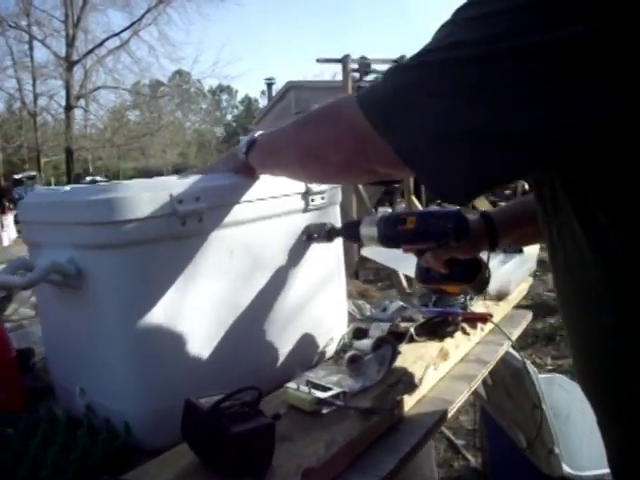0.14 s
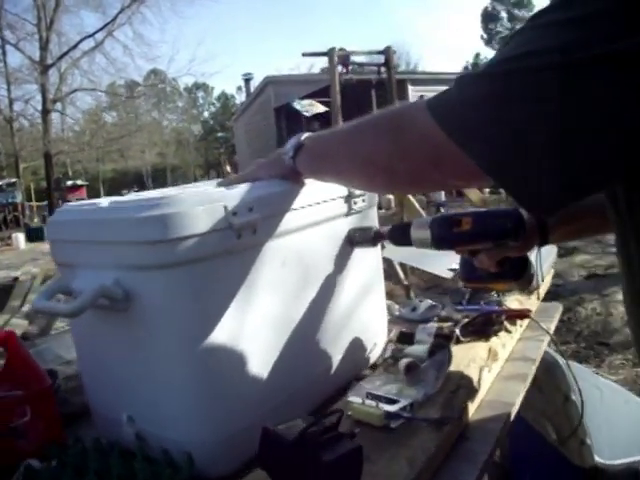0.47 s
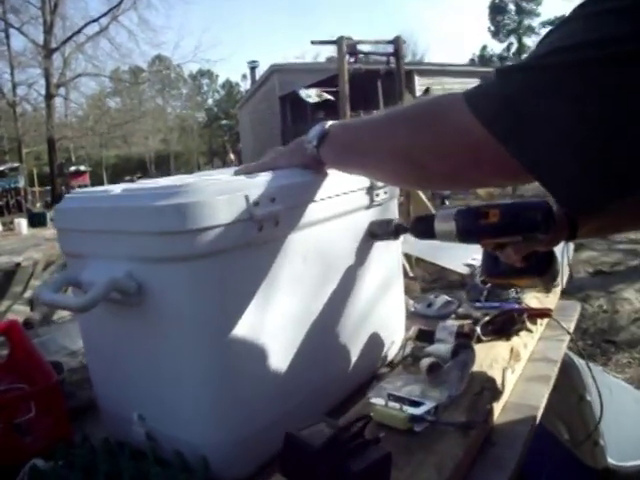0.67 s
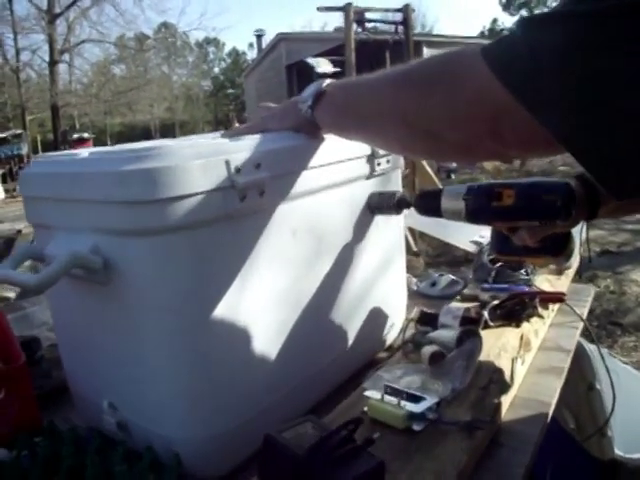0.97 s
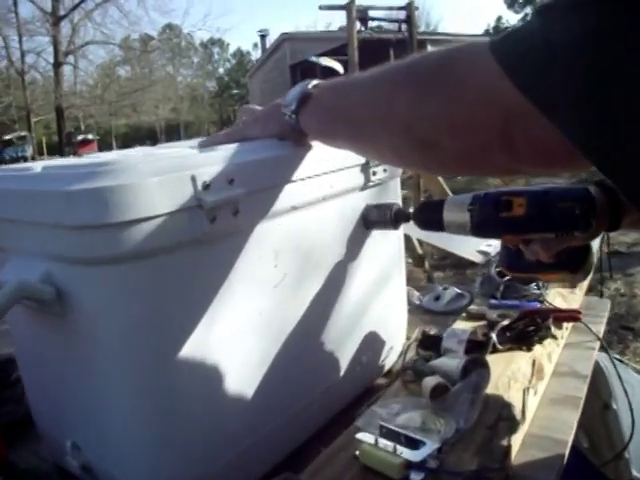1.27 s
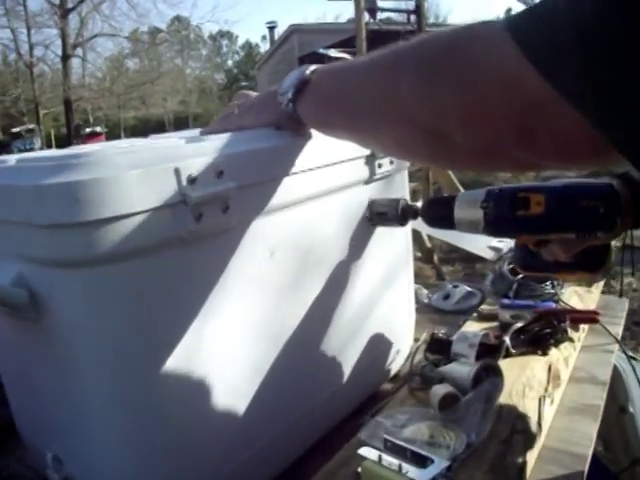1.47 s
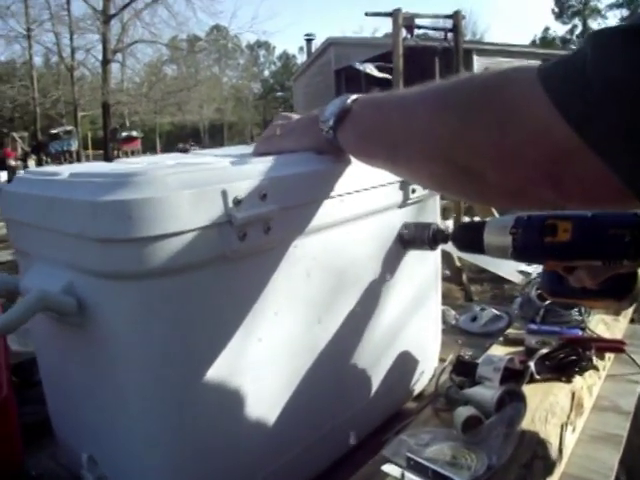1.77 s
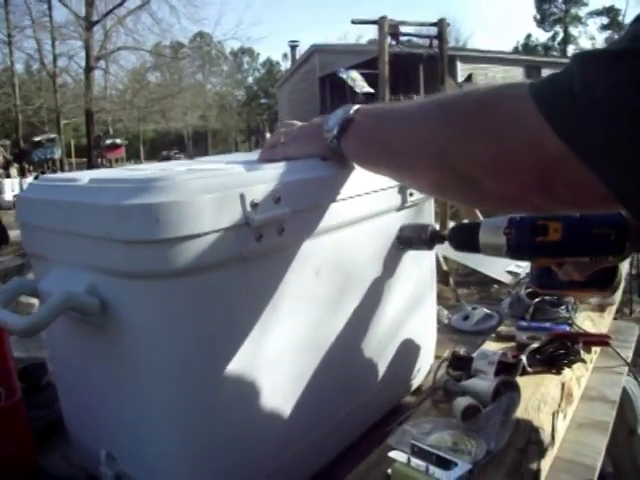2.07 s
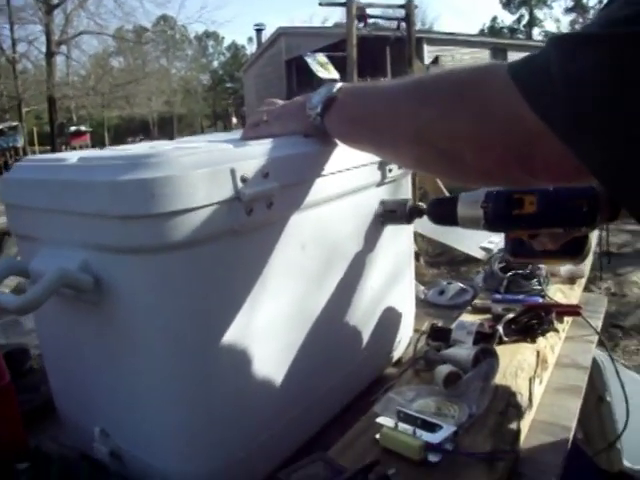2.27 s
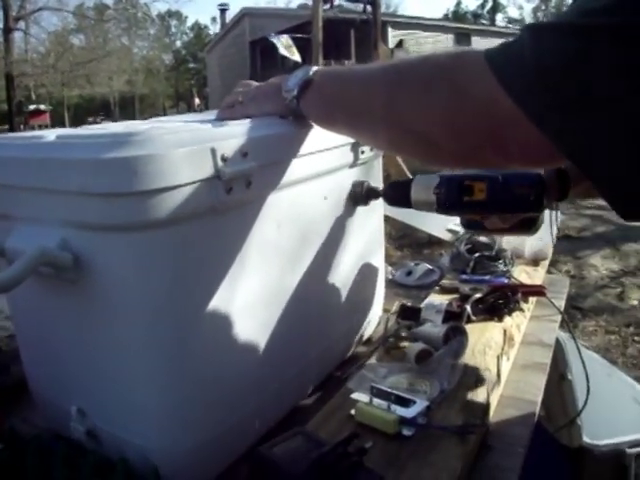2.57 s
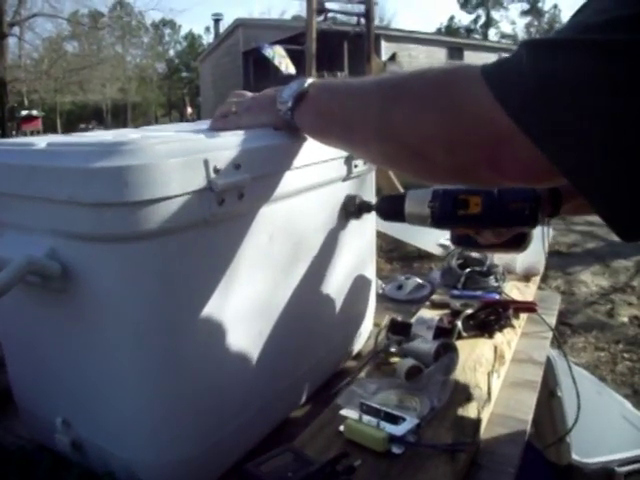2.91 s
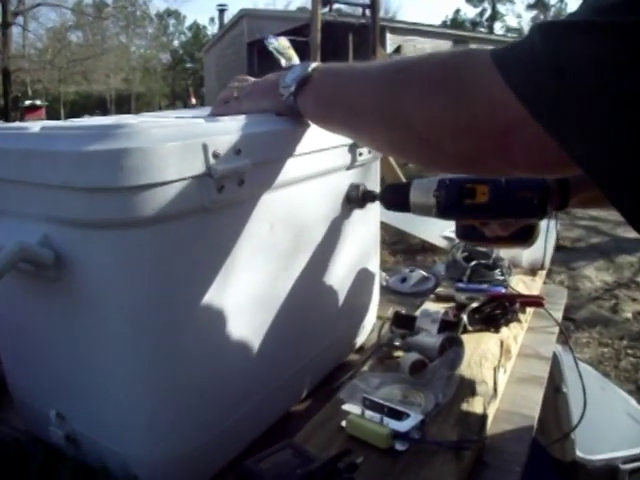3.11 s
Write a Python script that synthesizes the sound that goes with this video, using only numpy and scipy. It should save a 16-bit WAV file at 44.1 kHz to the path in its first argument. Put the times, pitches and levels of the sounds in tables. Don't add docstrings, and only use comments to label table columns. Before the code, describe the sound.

A cordless drill hole-saws a hollow plastic box outdoors, recorded close on a harsh, distorted low-rate camera microphone. Rattling, whining bursts run 0.05-0.3 and 0.4-0.74 seconds, the latter coasting briefly. A knock at 0.9 opens a third burst until 1.3; a short squeak at 1.4 leads into a fourth until 2.05. From 2.2 it grinds on to the end, pitch sagging, chips squealing, over gusty wind rumble.

```python
import sys
import numpy as np
from scipy import signal
from scipy.fft import rfft, irfft
from scipy.io import wavfile
from scipy.ndimage import uniform_filter1d

SR = 44100
rng = np.random.default_rng(int(sys.argv[2]) if len(sys.argv) > 2 else 0)


def generate_wav(signal):
    frames = np.transpose(np.atleast_2d(signal))
    scaled = np.clip(frames, -1, 1) * 32767
    pcm = np.round(scaled).astype(np.int16)
    wavfile.write(sys.argv[1], SR, pcm)


def level_to_linear(level):
    exponent = np.asarray(level, float) / 20
    return 10 ** exponent


N = 143325
T = np.arange(N) / SR
STEP = 4


def noise():
    return rng.standard_normal(N)


def follow(table):
    return np.interp(T, *np.transpose(table))


def evened(x):
    return x / np.sqrt(np.mean(x ** 2) + 1e-20)


def colour(x, points):
    f, db = np.transpose(points)
    log_hz = np.log(np.fft.rfftfreq(len(x), 1 / SR) + 1)
    gain_db = np.interp(log_hz, np.log(f), db, left=db[0] - 28.5, right=db[-1] - 21.0)
    return evened(irfft(rfft(x) * level_to_linear(gain_db), len(x)))


def slow(size):
    return evened(uniform_filter1d(uniform_filter1d(noise(), size), size))


def ring(x, modes):
    out = np.zeros(len(x))
    for hz, width, db in modes:
        r = np.exp(-np.pi * width / SR)
        poles = [1, -2 * r * np.cos(2 * np.pi * hz / SR), r * r]
        out += level_to_linear(db) * evened(signal.lfilter([1, 0, -1], poles, x))
    return evened(out)


def hum(x, track, width_hz):
    s, hz, db = np.transpose(track)
    turn = np.exp(2j * np.pi * np.cumsum(np.interp(T, s, hz)) / SR)
    r = np.exp(-np.pi * width_hz / SR)
    band = signal.lfilter([1], [1, -2 * r, r * r], x / turn)
    return level_to_linear(np.interp(T, s, db) + 9) * evened((turn * band).real)


def tone(track, orders=(1, 2), rough=1):
    s, hz, *db = np.transpose(track)
    turns = np.cumsum(np.interp(T, s, hz) * (1 + .008 * slow(size=150))) / SR
    on = uniform_filter1d(((T > s[0]) & (T < s[-1])) * 1., size=200)
    out = np.zeros(N)
    for i, k in enumerate(orders):
        level = np.interp(T, s, db[i % 2]) - 1.5 * (i // 2) - 1
        if k == 2 * orders[0]:
            level = level - 3
        grain = 2.5 * slow(size=50)
        flicker = 3 * slow(size=250)
        out += level_to_linear(level + rough * (grain + flicker)) * np.sin(2 * np.pi * k * turns)
    return np.sqrt(2) * on * out


# frequency in Hz, density in dB per Hz.
YARD_TONE = [(120, -39), (200, -11), (451, -9.5), (1320, -8), (1840, -4), (2430, -7), (2820, -0.5),
             (4700, -25.5), (5400, -6), (7020, -50), (11900, -120)]
# time in seconds, lift in dB.
YARD_SWELL = [(0, 2), (.06, 0.5), (.34, 4.5), (.8, 8.5), (.88, 0.5), (.92, 4), (1.34, 5), (1.4, 5),
              (2.1, 4.5), (2.19, 0.5)]


def yard():
    return level_to_linear(-33.5 + follow(YARD_SWELL) + slow(size=500)) * colour(noise(), YARD_TONE)


# time in seconds, level in dB.
WIND_LEVEL = [(0, -12), (.05, -18.5), (.27, -15.5), (.31, -14), (.38, -19.5), (.44, -13), (.64, -29.5),
              (.74, -19), (.9, -20.5), (.95, -12.5), (1.0, -28), (1.24, -22), (2.04, -31), (2.12, -19.5),
              (2.18, -28), (2.22, -14.5), (2.32, -28), (2.5, -45), (2.67, -28.5), (2.9, -40)]
# frequency in Hz, density in dB per Hz.
WIND_TONE = [(12, -10.5), (28, 2), (50, -3.5), (90, -5.5), (140, -12.5), (300, -36.5)]
# centre in seconds, length in seconds, frequency in Hz, level in dB.
SLAPS = [(0.29, 0.12, 24, -5.5), (0.33, 0.065, 44, -6.5), (0.38, 0.042, 35.4, -5.5), (0.41, 0.016, 50, -5),
         (0.892, 0.057, 46, -1), (0.092, 0.028, 50, -13), (0.919, 0.022, 35, -11), (2.122, 0.067, 28, -6.5),
         (0.54, .04, 29, -12)]


def wind():
    rumble = level_to_linear(follow(WIND_LEVEL) - 2.0 + 3.2 * slow(size=900)) * colour(noise(), WIND_TONE)
    slaps = np.zeros(N)
    for s, length, hz, db in SLAPS:
        window = np.cos(np.pi * np.clip((T - s) / length, -.5, .5)) ** 2
        slaps += level_to_linear(db) * window * np.cos(2 * np.pi * hz * (T - s))
    return rumble - slaps


# time in seconds, boom level in dB.
BITE = [(.04, -41.5), (.2, -18), (.36, -32.5), (.5, -25.5), (.75, -25), (.785, -35), (.83, -44), (.95, -21),
        (1.27, -24.5), (1.39, -38.5), (1.44, -23), (2.06, -25.5), (2.15, -44), (2.24, -22), (2.34, -27),
        (2.5, -13), (2.6, -27)]
# frequency in Hz, width in Hz, level in dB.
BOX_MODES = [(214.4, 42.5, -1.5), (270, 68, -3.5)]


def boom():
    drum = colour(ring(noise(), BOX_MODES), [(90, 3.0), (520, -9.5)])
    return level_to_linear(follow(BITE) + 3.0 * slow(size=300)) * drum


def knock():
    return -level_to_linear(-7) * np.exp(-abs(T - .896) / .0003)


# time in seconds, frequency in Hz, 2nd and 3rd partial in dB.
SQUEAK = [
    (1.403, 550, -28, -24),
    (1.409, 607, -22, -12),
    (1.422, 706, -17, -14),
    (1.432, 643, -15, -22),
]


def squeak():
    return tone(SQUEAK, orders=(2, 3, 4), rough=.3)


# time in seconds, peak level in dB.
SNAGS = [(.074, -10), (.088, -12), (0.3132, -12), (0.368, -9), (0.401, -4.5), (0.619, 1.5), (0.7393, -7),
         (0.924, 4.5), (1.0813, 0.5), (1.1445, 4.5), (1.201, 4), (1.4344, -4), (1.4717, 4.5), (1.9973, 1),
         (2.2034, 0.5), (2.8089, 2)]


def snags():
    rise_s, t60_s = .007, .032
    shape = np.zeros(N)
    for s, db in SNAGS:
        rise = np.clip((T - s) / rise_s + .5, 0, 1)
        shape += rise * level_to_linear(db - 5.5 - 60 * abs(T - s) / t60_s)
    return shape * colour(noise(), [(150, -14.5), (1000, 0), (1900, 5), (3000, 7.0), (5500, -32)])


# time in seconds, frequency in Hz, level in dB, octave in dB.
WHINE_1 = [(.11, 1500, -32, -36), (.135, 1950, -17.5, -13), (.17, 2320, -18.5, -24), (.2, 2470, -22, -32)]
WHINE_2 = [(0.429, 1800, -11, -36), (0.459, 2460, -28, -40.5), (0.61, 2612, -15, -42),
           (0.636, 2500, -16, -40), (0.661, 2263, -21, -34), (0.729, 2005, -30, -46)]
WHINE_3 = [(.975, 1753, -15, -32), (0.994, 1898, -11.5, -16), (1.02, 2186, -19, -15.5),
           (1.035, 2290, -20, -16), (1.063, 2434, -22, -37), (1.117, 2450, -29, -30),
           (1.29, 2680, -36, -48)]
WHINE_4 = [(1.475, 1400, -23, -47), (1.49, 1485, -14, -27), (1.52, 2110, -17, -12),
           (1.561, 2387, -25.5, -35.5), (1.7, 2575, -19.5, -49), (1.85, 2547, -15, -58),
           (2.001, 2546, -22, -48)]
WHINE_5 = [(2.26, 1800, -6, -29), (2.275, 1975, -14.5, -18), (2.34, 2332, -15.5, -34),
           (2.375, 2220, -19, -41), (2.399, 2320, -16, -24), (2.439, 2132, -12.5, -23),
           (2.494, 2210, -19.5, -47), (2.547, 2023, -18, -18.5), (2.6, 2250, -18.5, -29),
           (2.7, 2475, -20, -35), (2.819, 2444, -18, -55), (2.898, 2325, -17, -34), (3.0, 2226, -13.5, -22),
           (3.12, 2300, -16.5, -29), (3.25, 2425, -17.5, -46)]
WHINES = [WHINE_1, WHINE_2, WHINE_3, WHINE_4, WHINE_5]
STAGE_3 = [(1.08, 2150, -49, -36), (1.23, 2290, -28, -47)]
STAGE_4 = [(1.6, 2170, -26, -29), (1.801, 2240, -25, -26), (2.002, 2270, -30, -30)]


def gear_whine():
    return sum(tone(track) for track in WHINES + [STAGE_3, STAGE_4])


# start in seconds, rise in seconds, stop in seconds, fall in seconds, level in dB.
SQUEEZES = [
    (0.052, 0.067, 0.28, 0.028, -9.5),
    (0.394, 0.027, 0.743, 0.006, -9),
    (0.922, 0.017, 1.266, 0.058, -9.5),
    (1.426, 0.0072, 2.055, 0.028, -10),
    (2.198, 0.018, 3.6, .03, -11.5),
]


def trigger():
    level = np.zeros(N)
    for a, up, b, down, db in SQUEEZES:
        times = [a - .001, a, a + up, b, b + down, b + down + .001]
        level += level_to_linear(np.interp(T, times, [-99, db - 30.5, db, db, db - 18.5, -99]))
    return level


def tooth_clicks():
    s, hz = np.transpose(np.concatenate(WHINES))[:2]
    turn = np.cumsum(np.interp(T, s, hz)) / SR / 72
    throb = (1 + .12 * np.cos(2 * np.pi * turn)) * level_to_linear(1.5 * slow(size=160) + .7 * slow(size=700))
    strikes = rng.random(N) < 4500 / SR
    spread_db = 1.5 * np.minimum(rng.exponential(1, N), 4)
    return throb * strikes * noise() * level_to_linear(spread_db)


def coasting():
    stop_s = .742
    fall = (T > stop_s) * level_to_linear(-19.5 - 135 * abs(T - stop_s))
    return fall * colour(noise(), [(1200, -30), (2250, 8.5), (3100, 8), (4300, -28)])


# frequency in Hz, density in dB per Hz.
RATTLE_TONE = [(210, -44), (350, -16), (493, -22), (688, -13.5), (926, -16), (1860, -6.5), (2400, -4.5),
               (2910, 0), (5400, -21), (7020, -69), (11900, -120)]
# frequency in Hz, width in Hz, level in dB.
HOUSING = [(1800, 230, 0)]
# time in seconds, level in dB.
DEPTH = [(.3, -33), (.7, 2.5), (1.0, -1), (2.1, 2.5), (2.3, 8)]
# time in seconds, frequency in Hz, level in dB.
WALL = [(.6, 696, -41), (0.951, 654, -26), (1.55, 670, -36.5), (1.7, 717, -23.5), (2.0, 717, -30.5),
        (2.299, 570, -28.5), (2.55, 587, -25.5), (2.75, 706, -32), (2.921, 580, -23.5), (3.15, 675, -24.5)]
UPPER_WALL = [(2.0, 870, -49), (2.251, 870, -24), (2.4, 866, -56), (2.62, 922, -33.5)]
CHIPS = [(2.3, 1800, -46), (2.55, 640, -40), (2.58, 760, -18), (2.615, 983, -19), (2.64, 1000, -35),
         (2.93, 1360, -57), (2.96, 1570, -27), (3.0, 1800, -20), (3.04, 1720, -26), (3.09, 1970, -9),
         (3.12, 1800, -22), (3.16, 2040, -17), (3.25, 1900, -36)]
RIM = [(.1, 2080, -34), (.17, 2180, -21), (.3, 2035, -31), (1.55, 2870, -36), (1.7, 2660, -32),
       (2.05, 2680, -27), (2.25, 3210, -17), (2.4, 2680, -19), (2.6, 3000, -38), (3.1, 2600, -28.5)]
CUP = [(.1, 2700, -48), (.25, 3070, -34), (1.5, 2900, -15.5), (2.0, 2960, -16.5), (2.3, 2670, -24),
       (2.55, 2880, -25), (2.7, 2880, -13), (3.25, 2780, -19)]


def rattle():
    teeth = tooth_clicks()
    wide = evened(colour(teeth, RATTLE_TONE) + level_to_linear(-17) * ring(teeth, HOUSING))
    low = signal.filtfilt(*signal.butter(2, 1150, fs=SR), wide)
    cutting = 0.94 * (wide - low + low * level_to_linear(follow(DEPTH)))
    for track, width_hz in [(WALL, 130), (UPPER_WALL, 130), (CHIPS, 130), (RIM, 155), (CUP, 360)]:
        cutting = cutting + hum(teeth, track, width_hz)
    return trigger() * cutting + coasting()


def scene():
    background = yard() + wind()
    box = boom() + knock() + squeak() + snags()
    drill = gear_whine() + rattle()
    return (background + box + drill)[None]


# time in seconds, peak level in dB.
TICKS = [(0.0833, -37), (0.1242, -28), (0.4005, -35), (0.4245, -33), (0.4759, -31), (0.5183, -29),
         (0.628, -25), (0.6774, -32), (0.7408, -27), (0.9233, -37), (1.0431, -29), (1.0815, -23),
         (1.1174, -29), (1.1428, -23), (1.1648, -30), (1.2287, -29), (1.4347, -35), (1.4616, -27),
         (1.5409, -29), (1.5574, -29), (1.6412, -29), (1.7165, -30), (1.7994, -26), (1.9989, -22),
         (2.2284, -31), (2.3356, -30), (2.386, -33), (2.3985, -30), (2.4249, -28), (2.5247, -28),
         (2.6823, -33), (2.7143, -28), (2.8006, -23), (2.835, -32), (2.9837, -29), (3.0899, -30),
         (3.1348, -28), (3.1573, -31), (3.1767, -26), (3.2221, -27)]


def ticks(count):
    s, db = np.transpose(TICKS)
    out = np.zeros(count)
    at = np.round(s * SR / STEP).astype(int) + 8
    out[at] = level_to_linear(db + 17.5) * rng.choice([-1., 1.], len(s))
    return out


# frequency in Hz, density in dB per Hz.
HISS_TONE = [(9500, -14), (12000, 2), (12600, 0)]


def treble_hiss():
    return level_to_linear(-44.5 + 2.8 * slow(size=500)) * trigger() * colour(noise(), HISS_TONE)


def top_cut(x):
    return signal.sosfilt(signal.butter(12, 15850, fs=SR, output="sos"), x)


def record(dry):
    ceiling, knee, clip = 1.25, 4, 1.02
    low = dry[0] / (1 + abs(dry[0] / ceiling) ** knee) ** (1 / knee)
    low = signal.lfilter(*signal.butter(8, 4430, fs=SR), low)
    low = signal.resample_poly(low, 1, STEP)
    grit = (level_to_linear(-47) + level_to_linear(-26) * trigger()[::STEP]) * rng.standard_normal(len(low))
    low = np.clip(low + ticks(count=len(low)) + grit, -clip, clip)
    wide = np.interp(np.arange(N), np.arange(len(low)) * STEP, low)
    wide = signal.lfilter(*signal.butter(1, 13300, fs=SR), wide + treble_hiss())
    edge = signal.firwin(511, 15720, window=("kaiser", 9), fs=SR)
    wide = signal.oaconvolve(wide, edge, "same")
    return top_cut(wide[None])


dry = scene()
out = record(dry)
generate_wav(out)
```